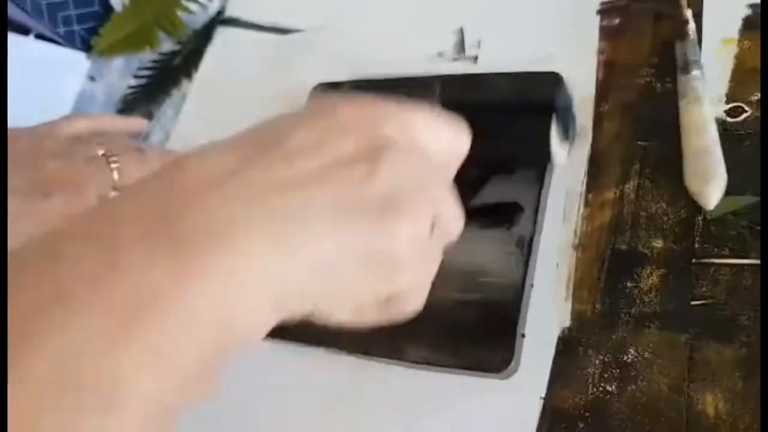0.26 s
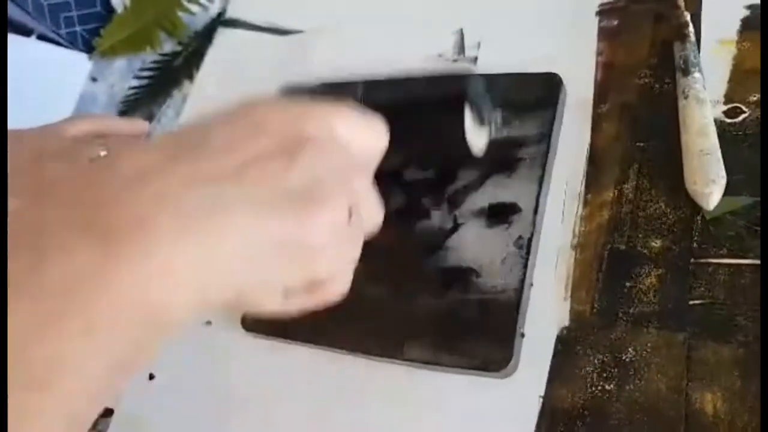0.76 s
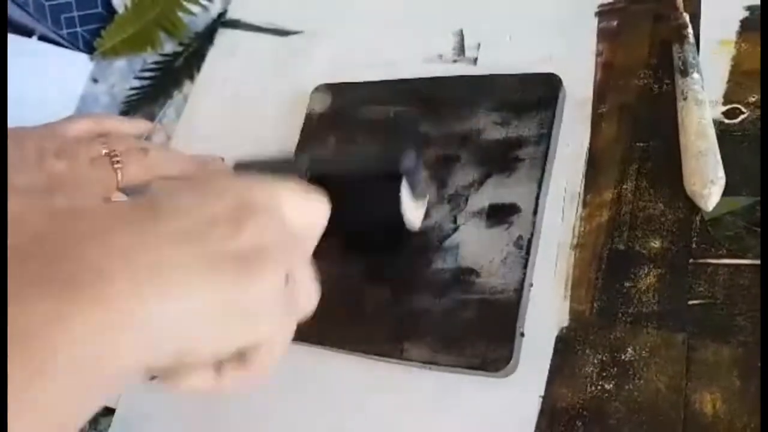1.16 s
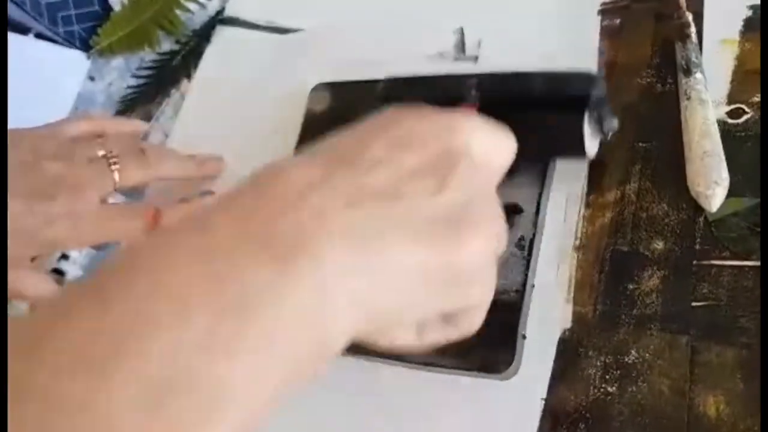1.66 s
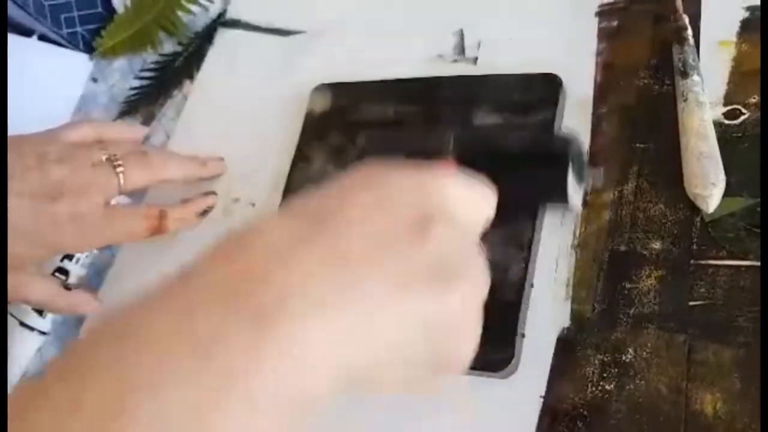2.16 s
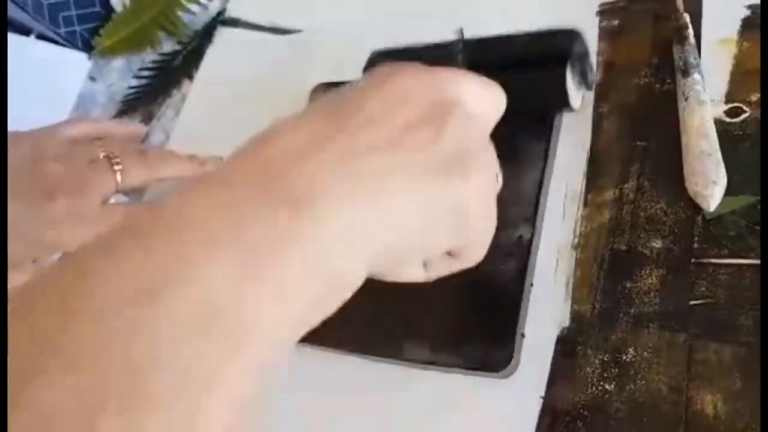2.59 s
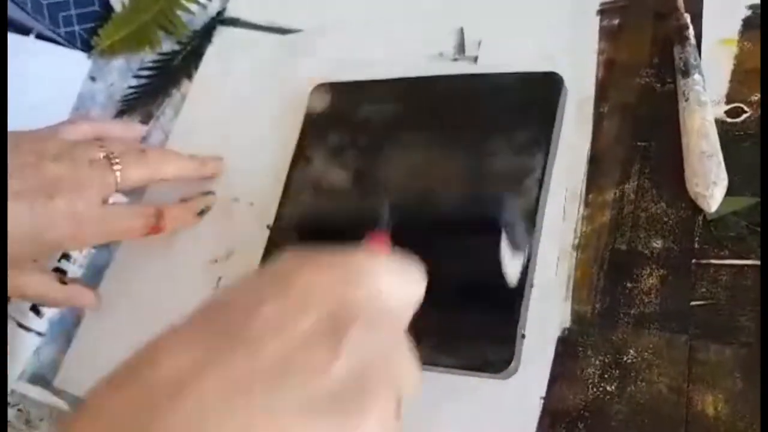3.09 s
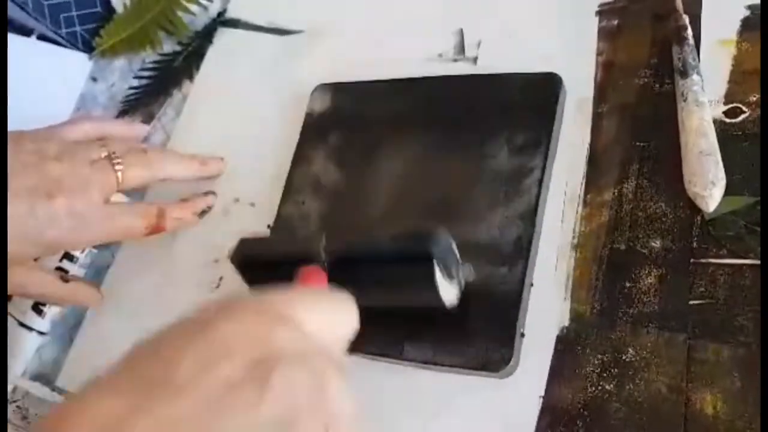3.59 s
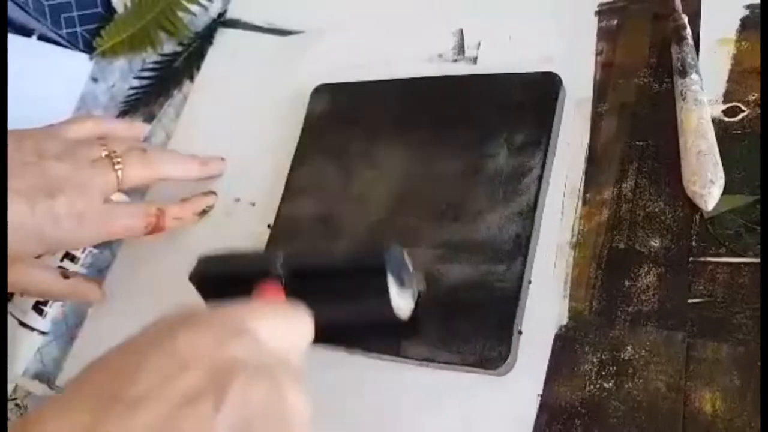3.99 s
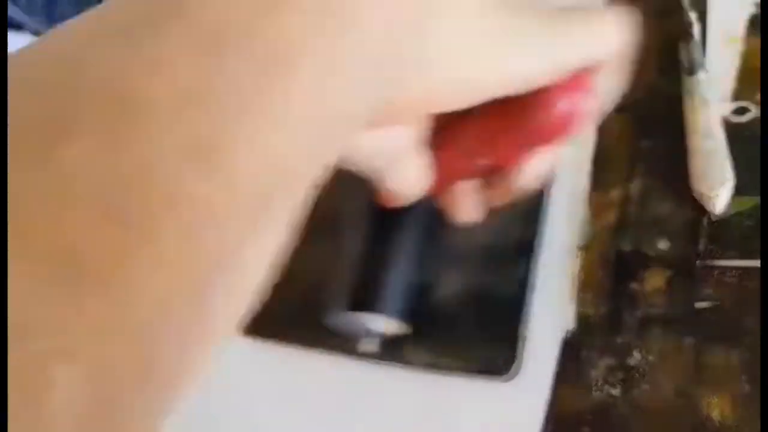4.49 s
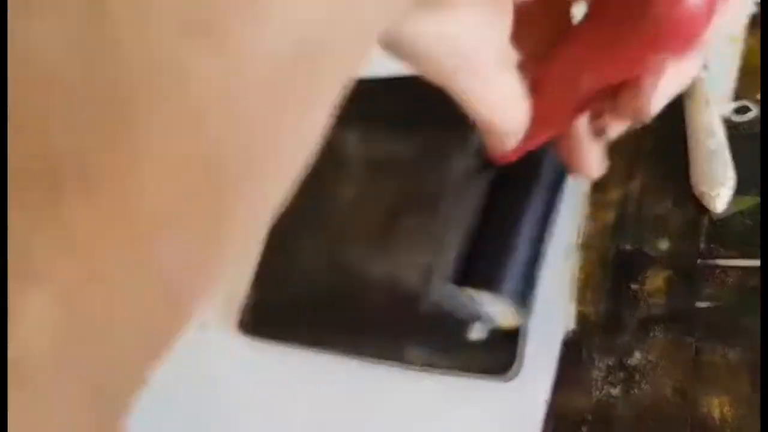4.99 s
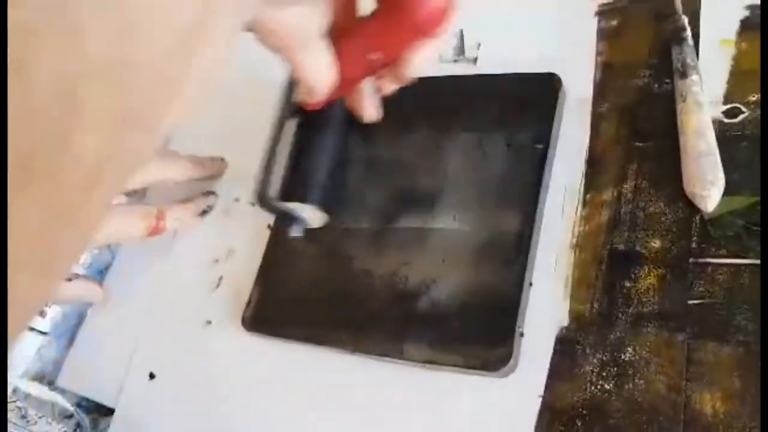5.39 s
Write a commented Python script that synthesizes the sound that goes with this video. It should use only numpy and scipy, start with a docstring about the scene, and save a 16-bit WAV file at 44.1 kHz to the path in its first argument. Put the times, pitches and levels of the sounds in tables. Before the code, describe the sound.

A rubber roller spreads tacky ink on a plate, heard very close in a small furnished room, over a faint low murmur and slight treble hiss. From 0 to 2 seconds, it lands roughly every quarter second: a soft, quickly choked wooden table thump, a short rubber skid and wet smack, then about ten milliseconds later a hard loose clack from axle and frame. Between landings, short strokes swell and fade with fine ink sizzle and a duller axle rub. Around 2.0 to 2.85 the landings crowd together, with brighter wet spits and a sharp clack near 2.5. After 3 seconds thumps and rattles are much weaker, while sticky crackling bursts stand out at 3.25, 3.65 and 4.45. A modest landing comes at 4.15, small rattles around 4.35, and a near lull at 4.9. A sticky smack starts a stroke at 5.2, a dull arm brush peaks near 5.45, and a soft thump follows at 5.6.

```python
"""Soft table thumps, wet smacks and loose clacks punctuate a fine sizzle: a brayer inks a plate close by.
Each landing pushes ringing table modes, skids the rubber and parts the ink; the axle hits its frame later.
In the strokes, dense grains make torn ink threads, rubber drag and axle rub, which follow the roller's speed.
Short wet clicks, frame rattles and an arm brushing the table join in, over a low murmur and faint treble hiss."""
import sys
import numpy as np
from scipy import signal
from scipy.fft import rfft, irfft
from scipy.io import wavfile

SR = 44100
rng = np.random.default_rng(int(sys.argv[2]) if len(sys.argv) > 2 else 0)


def persist_wave(psi):
    """Save psi, clipped to +-1, as 16-bit WAV."""
    counts = np.round(np.clip(psi, -1, 1) * 32767).astype(np.int16)
    wavfile.write(sys.argv[1], SR, np.atleast_2d(counts).T)


N = 249165
TIME = np.arange(N) / SR
AGE = np.arange(SR // 2) / SR  # seconds since a hit began

# roller landings, levels ahead of each layer's trim: t/s, thump level/dB, upper over lower table modes/dB,
# smack level/dB, bright spit level/dB, clack delay/s, clack level/dB, crack over clack/dB
LANDINGS = [(0.06, -37, -1.5, -62.5, -57, .012, -36.5, -17), (0.307, -37, -9.5, -67, -63, .0107, -34, -10),
            (0.563, -32.5, -4, -47, -49, .0112, -35.5, -5.5),
            (0.806, -35.5, -7, -46, -41.5, .0103, -40.5, -13),
            (1.081, -34.5, -0.5, -50, -47, 0.0022, -58, -1),
            (1.361, -42.5, 10.5, -48, -52.5, 0.0096, -44, -16),
            (1.627, -39.5, -4, -59, -51, 0.01, -38.5, -17),
            (1.907, -39.5, -3.5, -51.5, -52, .0103, -41, -12),
            (2.097, -43, -2.5, -56.5, -43, .013, -41, -12), (2.305, -35, -8.5, -52, -41, .009, -35, -17),
            (2.483, -35, -3, -46.5, -37, 0.0012, -35.5, -7), (2.646, -44, -3, -54, -49, 0.0066, -52.5, -27),
            (2.842, -43.5, -4.5, -52, -42.5, 0.0011, -51, -11),
            (3.005, -65, -26, -78, -74, 0.0011, -52, -39),
            (3.236, -51.5, -4.5, -56.5, -68, 0.0091, -68, -15),
            (3.648, -51.5, -1, -50.5, -41, 0.0084, -74, -12),
            (3.991, -61.5, 2, -60.5, -47.5, .008, -46, -18),
            (4.159, -46, -4.5, -52.5, -42.5, .002, -65, -7), (4.954, -63.5, 9, -80, -68, 0.0013, -61, -20),
            (5.183, -60, -1.5, -45.5, -44, .003, -87, -3), (5.586, -47, -4, -48, -47, .001, -62, -5)]
# spectrum of rubber skidding or dragging: f/Hz, level/dB
SCUFF_COLOUR = [(120, -17.5), (260, 2.5), (420, 3.5), (750, -5.5), (1500, -13.5), (2400, -17),
                (4000, -28.5), (16000, -44)]


def undb(db):
    """Decibels to gain."""
    return 10 ** (np.asarray(db) / 20)


def unit(x):
    """Scale to rms 1."""
    return x / np.sqrt(np.mean(x ** 2))


def unit_attack(x, seconds):
    """Scale a hit so that its first moments have rms 1."""
    return x / np.sqrt(np.mean(x[..., :int(seconds * SR)] ** 2))


def lookup(points, hz):
    """Read (Hz, value) points on a log-frequency axis."""
    f, value = np.transpose(points)
    return np.interp(np.log(hz + 1), np.log(f), value)


def colour(x, points, size=2048):
    """Causal filter with the given spectrum, from the folded cepstrum."""
    hz = np.fft.rfftfreq(size, 1 / SR)
    cepstrum = irfft(np.log(undb(lookup(points, hz))))
    cepstrum[1:size // 2] *= 2
    cepstrum[size // 2 + 1:] = 0
    response = irfft(np.exp(rfft(cepstrum)))
    return signal.fftconvolve(x, response[None], axes=-1)[:, :x.shape[-1]]


def fade(t60):
    """Exponential decay, 60 dB down after t60 seconds."""
    return np.exp(-np.log(1000) * AGE / t60)


def spread(three, width):
    """Two channels that share the first of three signals; width 0 is alike, 1 unrelated."""
    width = np.clip(width, 0, 1)
    return np.sqrt(1 - width) * three[0] + np.sqrt(width) * three[1:]


def burst(t60, width):
    """A decaying burst of stereo noise."""
    return spread(rng.standard_normal((3, len(AGE))), width) * fade(t60)


def grains(per_second, scatter_db, width):
    """Random clicks of uneven size and either polarity, rms 1."""
    hits = rng.random((3, N)) < per_second / SR
    sizes = undb(scatter_db * np.minimum(rng.exponential(size=(3, N)), 5))
    polarity = rng.choice([-1, 1], (3, N))
    return unit(spread(hits * sizes * polarity, width))


def pan(x, left_db):
    """Lean a sound to the left by a level difference."""
    return x * undb(np.array([[left_db], [-left_db]]) / 2)


def add(track, s, hit):
    """Mix a hit into the track at s seconds."""
    start = max(int(s * SR), 0)
    part = hit[..., :max(N - start, 0)]
    track[:, start:start + part.shape[-1]] += part


def room_tone(tone_db=-69):
    """The quiet low murmur of the room: steady noise weighted to the bass."""
    # murmur spectrum: f/Hz, level/dB
    murmur_colour = [(25, -57), (55, -2.5), (90, 6), (175, 7.5), (300, -4), (500, -9.5), (800, -14),
                     (2000, -17.5), (5000, -23.5), (16000, -30)]
    noise = spread(rng.standard_normal((3, N)), width=0.49)
    return pan(undb(tone_db) * unit(colour(noise, murmur_colour)), left_db=2)


def stroke_speed(start_s, length_s, landing_near_s=.02, landed_speed=0.56, touch_s=0.0026):
    """The roller lands moving or sets off from rest, eases up to full speed, then brakes smoothly to a stop."""
    lands = any(abs(s - start_s) < landing_near_s for s, *_ in LANDINGS)
    entry = landed_speed * lands  # share of full speed
    progress = (TIME - start_s) / length_s
    crest = 0.29 + 0.091 * entry  # share of the stroke at which speed peaks, later after a landing
    arch = np.sin(np.pi / 2 * np.interp(progress, [0, crest, 1], [0, 1, 0])) ** 2
    contact = np.clip((TIME - start_s) / touch_s, 0, 1)  # the rubber flattens on the plate
    return contact * (arch + entry * (1 - arch) * (progress < crest))


def rolling(sizzle_db=0.0, rub_db=0.0, drag_db=-13, grip_hz=80, hiss_db=-87.5, rub_power=1.63):
    """Ink threads tear, rubber drags and the axle rubs and catches with speed; tack wavers sizzle and rub."""
    # strokes over the plate, levels at full speed: t/s, length/s, ink sizzle level/dB, axle rub level/dB
    strokes = [(-.17, 0.23, -59, -49.5), (0.066, 0.24, -62.5, -60), (0.304, 0.23, -61, -57),
               (0.568, 0.19, -63, -62), (0.791, 0.27, -63, -67.5), (1.072, 0.28, -61.5, -61.5),
               (1.356, 0.24, -61, -61), (1.636, 0.23, -61.5, -59.5), (1.908, 0.15, -60.5, -56.5),
               (2.097, .21, -55.5, -57.5), (2.299, .15, -59, -62), (2.48, 0.18, -54, -60.5),
               (2.627, 0.2, -58.5, -57.5), (2.839, 0.15, -50, -57), (2.95, 0.29, -59, -59.5),
               (3.23, 0.14, -49.5, -56.5), (3.363, .25, -56.5, -61.5), (3.644, 0.13, -51.5, -58.5),
               (3.776, 0.25, -57, -62.5), (3.96, 0.49, -74.5, -80.5), (4.157, 0.34, -61, -61.5),
               (4.436, 0.2, -50.5, -56), (4.628, 0.33, -59, -61), (4.89, 0.18, -81, -70.5),
               (5.198, 0.34, -57, -67), (5.595, .15, -59, -64.5)]
    # tearing ink spectrum: f/Hz, level/dB
    ink_colour = [(1000, -8), (2500, -4.5), (4000, -14), (5200, -8), (6500, -1), (8200, 2.5), (10000, 1),
                  (12500, 6.5), (14500, 2.5), (16000, 6.5)]
    # axle rub spectrum: f/Hz, level/dB
    rub_colour = [(50, -2.5), (100, -3.5), (175, 14), (280, -6.5), (500, -15), (780, -5), (970, 2),
                  (1400, 2.5), (1900, -2.5), (2500, -12.5), (3700, -28), (16000, -37)]
    ink, rub = 0, 0
    for start_s, length_s, ink_db, axle_db in strokes:
        speed = stroke_speed(start_s, length_s)
        ink = ink + undb(ink_db) * speed
        rub = rub + undb(axle_db) * speed ** rub_power
    tack_db = 2.4 * np.interp(TIME * grip_hz, np.arange(N), rng.standard_normal(N))

    threads = grains(per_second=4500, scatter_db=3, width=.95)
    sliding = grains(per_second=2700, scatter_db=1.0, width=0.71)
    catches = .5 * grains(per_second=130, scatter_db=2.2, width=.25)
    skids = grains(per_second=2000, scatter_db=0.0, width=0.41)

    # a faint treble hiss stays under the strokes
    sizzle = unit(colour(threads, ink_colour)) * (ink + undb(hiss_db)) * undb(sizzle_db + tack_db / 2)
    friction = unit(colour(sliding + catches, rub_colour)) * rub * undb(rub_db + tack_db)
    drag = unit(colour(skids, SCUFF_COLOUR)) * ink * undb(drag_db)
    return sizzle + pan(friction + drag, left_db=2.0)


def table_thumps(contact_s=0.0023, split_hz=165, upper_db=-7, thump_db=0.0):
    """Soft rubber pushes the table top for a few ms; it rings until the hand's weight chokes it."""
    # table top modes before detuning and choking: f/Hz, level/dB, t60/s
    table_modes = [(58, -14, .12), (97, -5.5, .25), (137, 0, .32), (191, -8, .3), (214, -19, .2),
                   (247, -12, .22), (286, -12, .25), (330, -20, .2), (388, -18, .2), (424, -15, .25),
                   (537, -19, .18), (577, -18, .18), (712, -16, .14)]
    # the hand presses down after press_s and chokes the ring to a share of itself
    press_s, choke_s, ring_left = .041, .008, .25
    out = np.zeros((2, N))
    push = AGE * np.exp(-4 * AGE / contact_s)
    damping = ring_left + (1 - ring_left) * np.exp(-np.maximum(AGE - press_s, 0) / choke_s)
    for s, db, tilt_db, *_ in LANDINGS:
        ring = 0
        for k, (hz, mode_db, t60) in enumerate(table_modes):
            stray_db, detune = rng.standard_normal(2) * [1, .008]
            # the landing place weights the modes above split_hz; upper_db is the neutral tilt
            place_db = (hz > split_hz) * (tilt_db - upper_db)
            # neighbours swing opposite ways, so the thump swells
            weight = (-1) ** k * undb(mode_db + place_db + stray_db)
            ring = ring + weight * fade(t60) * np.sin(2 * np.pi * hz * (1 + detune) * AGE)
        thump = signal.fftconvolve(ring * damping, push)[:len(AGE)]
        add(out, s, undb(db + thump_db) * unit_attack(thump, seconds=0.1))
    return pan(out, left_db=2.0)


def rubber_scuffs(scuff_db=-17.0, medium_db=-38.5, growth=0.74):
    """The rubber skids for an instant as each landing spins it up."""
    out = np.zeros((2, N))
    for s, db, *_ in LANDINGS:
        scuff = colour(burst(t60=0.16, width=0.04), SCUFF_COLOUR)
        strength_db = medium_db + growth * (db - medium_db)  # grows more slowly than the thump
        add(out, s, undb(strength_db + scuff_db) * unit_attack(scuff, seconds=0.063))
    return pan(out, left_db=9.5)


def ink_smacks(smack_db=-3.5, spit_db=-4.5, squeeze_s=.0012, click_spit_db=5):
    """Many ink threads part at once on landing: a wet click with a bright spit; more clicks fall between."""
    # short wet clicks with bright spit, in the strokes or on a clack: t/s, level/dB ahead of the trims
    wet_clicks = [(0.174, -62.5), (0.317, -56), (0.418, -60), (0.516, -75.5), (0.666, -57), (0.827, -51.5),
                  (1.196, -57), (1.477, -51.5), (1.756, -58), (1.965, -57.5), (2.058, -55), (2.204, -52),
                  (2.243, -57), (3.793, -68), (4.329, -55.5), (4.666, -63)]
    # wet click spectrum: f/Hz, level/dB
    smack_colour = [(1500, -26), (3400, -4.5), (4500, -17.5), (5400, 0.5), (6300, 5.5), (7500, -1.5),
                    (9000, -10), (11000, -51.5), (16000, -39)]
    # bright spit spectrum: f/Hz, level/dB
    spit_colour = [(5000, -19), (9000, 0), (10500, -6.5), (12000, 0.5), (13000, -3), (14300, -1),
                   (16000, -3.5)]
    out = np.zeros((2, N))
    # the ink squeezes out just after first contact
    on_landing = [(s + squeeze_s, low_db, high_db) for s, _, _, low_db, high_db, *_ in LANDINGS]
    extra = [(s, db, db + click_spit_db) for s, db in wet_clicks]
    for s, low_db, high_db in on_landing + extra:
        smack = unit_attack(colour(burst(t60=0.027, width=1.0), smack_colour), seconds=0.0078)
        spit = unit_attack(colour(burst(t60=0.019, width=0.82), spit_colour), seconds=0.0068)
        add(out, s, undb(low_db + smack_db) * smack + undb(high_db + spit_db) * spit)
    return out


def axle_clacks(ring_db=-15, clack_db=-1.98, chatter_db=-21, impact_db=17, rattle_crack_db=-19):
    """One hard contact with a little chatter after it, longer in a loose rattle; the frame rings briefly."""
    # the loose axle rattles as the roller rebounds, turns round or lifts: t/s, level/dB ahead of the trims
    rattles = [(0.210, -51.5), (0.221, -46), (0.231, -55), (0.394, -55), (0.432, -70), (0.464, -54),
               (1.203, -55.5), (1.252, -50), (1.725, -56.5), (1.795, -62), (1.993, -50.5), (2.104, -41.5),
               (2.236, -49.5), (2.243, -46), (2.411, -56), (2.496, -36), (2.617, -49.5), (2.783, -59.5),
               (2.852, -45.5), (3.189, -61.5), (3.567, -62.5), (3.993, -52), (4.333, -55.5), (4.386, -57),
               (4.412, -60), (5.429, -53)]
    # roller frame modes: f/Hz, level/dB, t60/s
    frame_modes = [(888, 1, 0.11), (1090, -16, 0.18), (1290, 7, 0.18), (1464, 21, 0.049),
                   (1590, -17, 0.058), (1610, -18, 0.13), (1757, 10.5, 0.079), (1970, -19, 0.18),
                   (2280, 11, 0.1), (3370, -13.5, 0.16), (3280, -40, .09)]
    # clack body spectrum: f/Hz, level/dB
    clack_colour = [(200, 0), (450, -4), (780, -5), (960, 2), (1200, -2.5), (1600, 5.5), (2200, -6),
                    (2800, -20.5), (5000, -67), (16000, -54)]
    # sharp crack spectrum: f/Hz, level/dB
    crack_colour = [(1200, -41), (2300, -3), (2800, -1.5), (3400, -4), (3900, -13.5), (4700, -5),
                    (5500, -23.5), (9000, -32), (16000, -12.5)]
    blow_t60, buzz_t60 = 0.011, 0.029  # seconds: landing clack, loose rattle
    out = np.zeros((2, N))
    impact = undb(impact_db) * signal.unit_impulse(len(AGE), int(0.0005 * SR))
    after_landings = [(s + delay_s, db, sharp_db, blow_t60) for s, *_, delay_s, db, sharp_db in LANDINGS]
    loose = [(s, db, rattle_crack_db, buzz_t60) for s, db in rattles]
    for s, db, sharp_db, contact_t60 in after_landings + loose:
        chatter = undb(chatter_db) * burst(t60=0.065, width=0.46)
        contact = impact + burst(t60=contact_t60, width=0.51) + chatter
        body = unit_attack(colour(contact, clack_colour), seconds=0.0099)
        crack = unit_attack(colour(burst(t60=0.057, width=0.96), crack_colour), seconds=0.0083)
        ring = 0
        for hz, mode_db, t60 in frame_modes:
            place = spread(rng.standard_normal((3, 1)), width=0.79)  # random gain per channel
            ring = ring + undb(mode_db) * fade(t60) * np.sin(2 * np.pi * hz * AGE) * place
        ring = unit_attack(ring, seconds=0.025)
        clack = undb(clack_db) * body + undb(ring_db) * ring + undb(sharp_db) * crack
        add(out, s, undb(db) * clack)
    return pan(out, left_db=1.5)


def arm_brush():
    """A dull, quiet rub as the arm swings softly over the table: coloured noise under a drawn envelope."""
    # brush envelope: t/s, level/dB
    brush = [(5.15, -88), (5.25, -74), (5.36, -71), (5.45, -64.5), (5.52, -75), (5.57, -98)]
    # brush spectrum: f/Hz, level/dB
    brush_colour = [(80, -17), (220, 4), (300, -5), (410, 1.5), (560, -9), (900, -24), (4000, -41)]
    s, db = np.transpose(brush)
    noise = unit(colour(spread(rng.standard_normal((3, N)), width=0.16), brush_colour))
    return noise * np.interp(TIME, s, undb(db), left=0, right=0)


def room(x, wet_db, width, delay_s=0.001, build_s=0.0025):
    """Diffuse reflections of a small furnished room: noise bands that each decay at their own rate."""
    # room decay: f/Hz, t60/s
    room_decay = [(100, 0.25), (400, 0.45), (1500, 0.1), (5000, 0.22), (15000, 0.2)]
    hz = np.fft.rfftfreq(len(AGE), 1 / SR)
    noise = rfft(spread(rng.standard_normal((3, len(AGE))), width))
    centres, decays = np.transpose(room_decay)
    tail = 0
    for band, t60 in zip(np.eye(len(centres)), decays):
        band_gain = lookup(np.c_[centres, band], hz)  # overlapping triangles on the log axis
        tail = tail + irfft(noise * band_gain, len(AGE)) * fade(t60)
    tail = tail * np.clip((AGE - delay_s) / build_s, 0, 1)
    tail = unit(tail) / np.sqrt(len(AGE))
    return x + undb(wet_db) * signal.fftconvolve(x, tail, axes=-1)[:, :N]


def scene():
    """Roller, plate and table: the hits excite the room, the rolling, brush and murmur stay dry."""
    thumps = room(table_thumps() + rubber_scuffs(), wet_db=-17, width=.6)
    smacks = room(ink_smacks(), wet_db=-5, width=1.0)
    clacks = room(axle_clacks(), wet_db=-5.5, width=1.0)
    return room_tone() + rolling() + thumps + smacks + clacks + arm_brush()


def record(dry, low_cut_hz=42, top_hz=15900):
    """The phone thins the deepest bass and cuts the top steeply."""
    high_pass = signal.butter(2, low_cut_hz, "high", fs=SR, output="sos")
    low_pass = signal.ellip(10, .2, 70, top_hz, fs=SR, output="sos")  # .2 dB ripple, 70 dB stop band
    thinned = signal.sosfilt(high_pass, dry)
    return signal.sosfilt(low_pass, thinned)


dry = scene()
out = record(dry)
persist_wave(out)
```